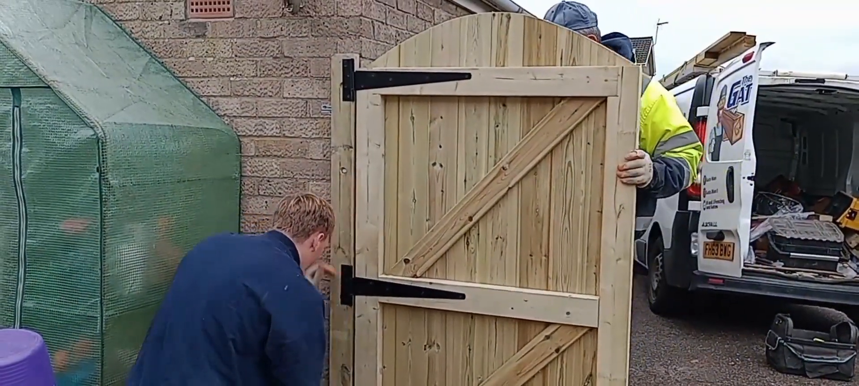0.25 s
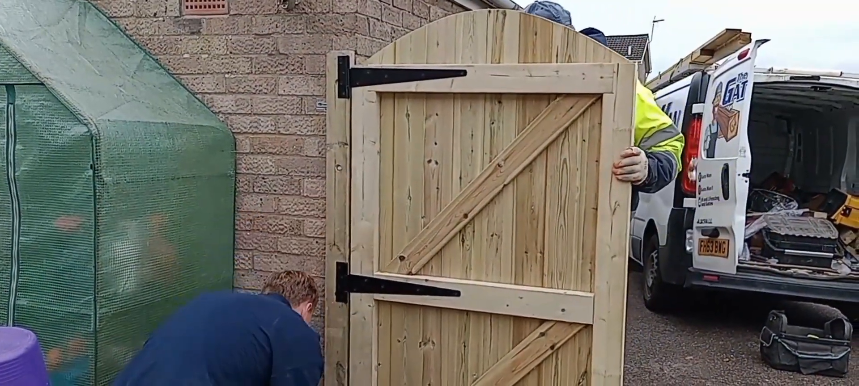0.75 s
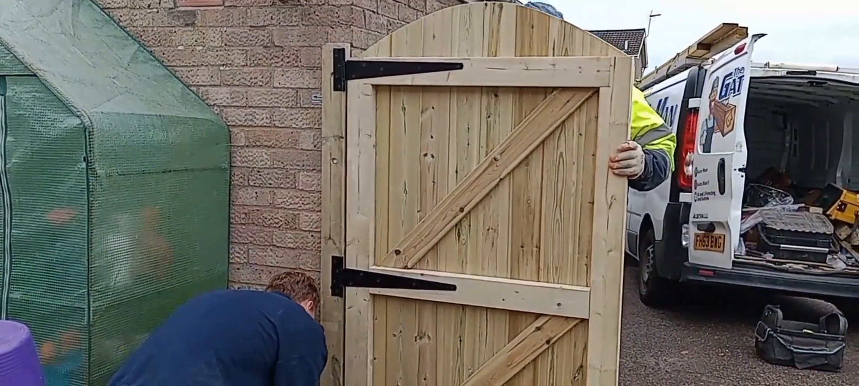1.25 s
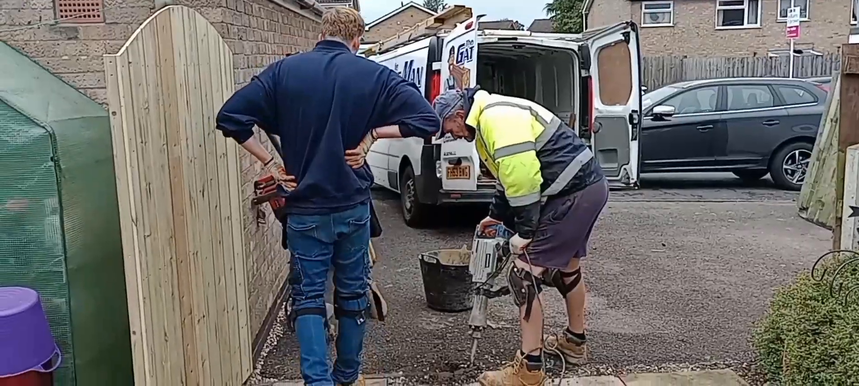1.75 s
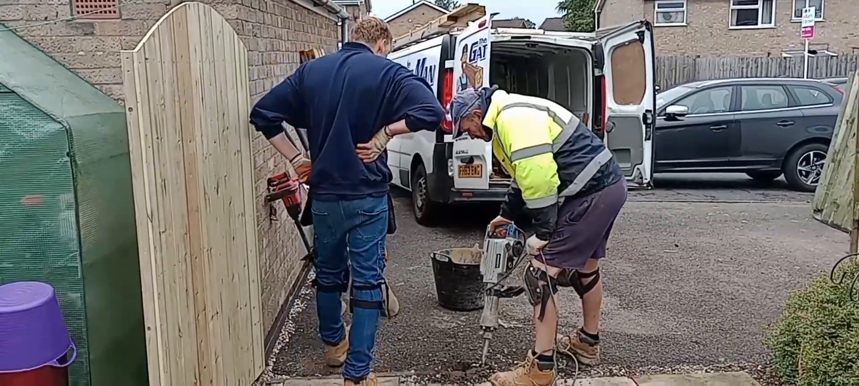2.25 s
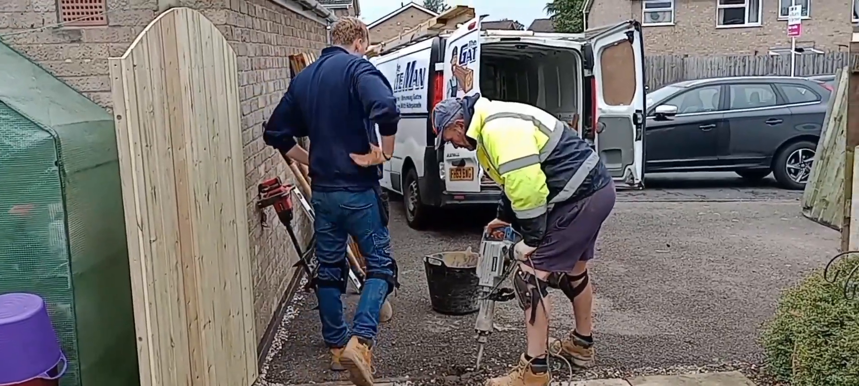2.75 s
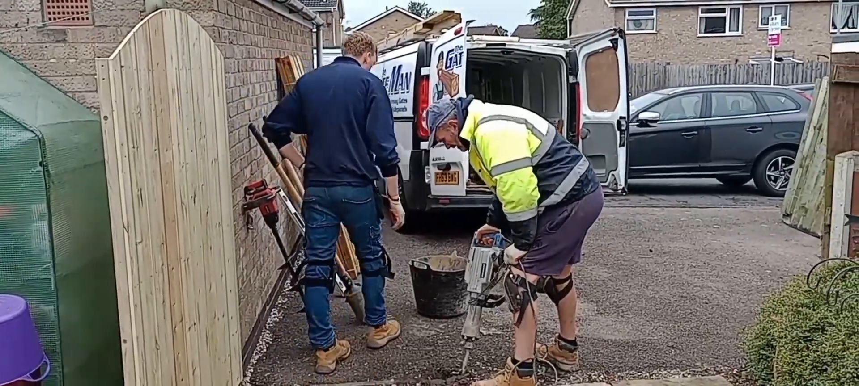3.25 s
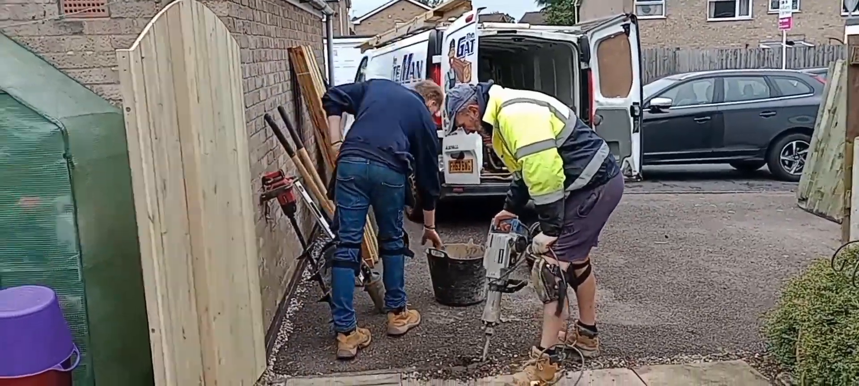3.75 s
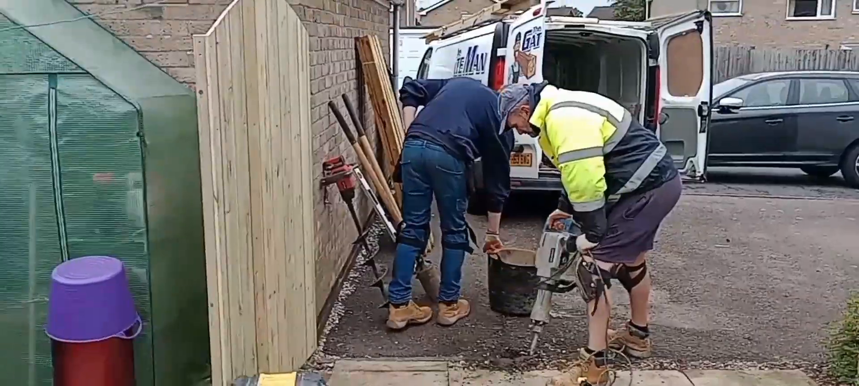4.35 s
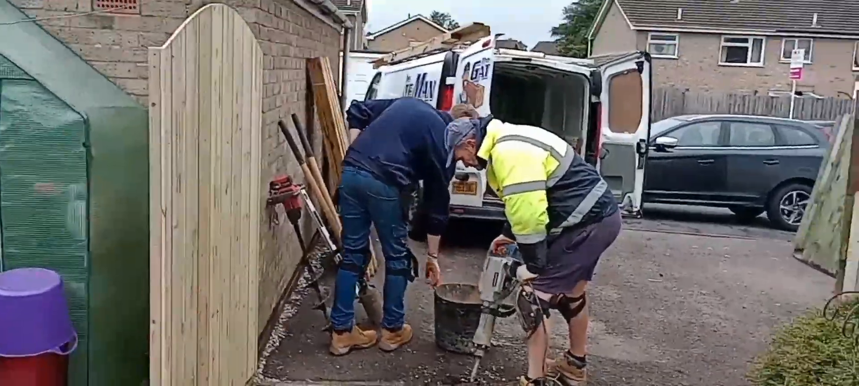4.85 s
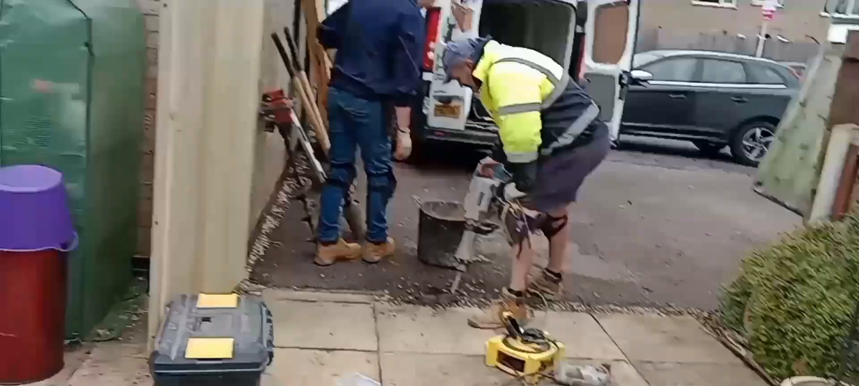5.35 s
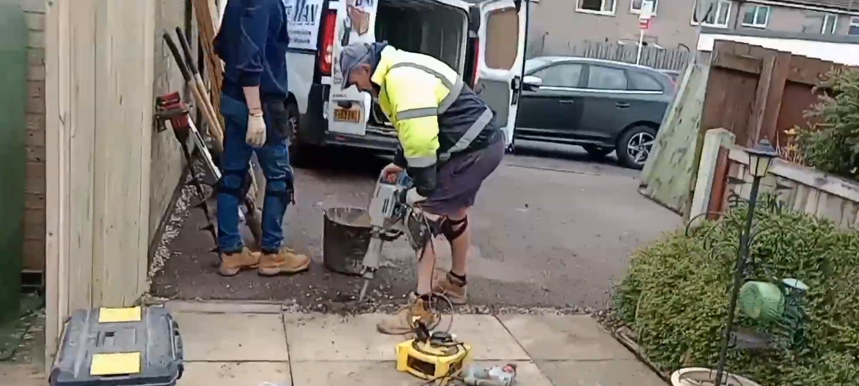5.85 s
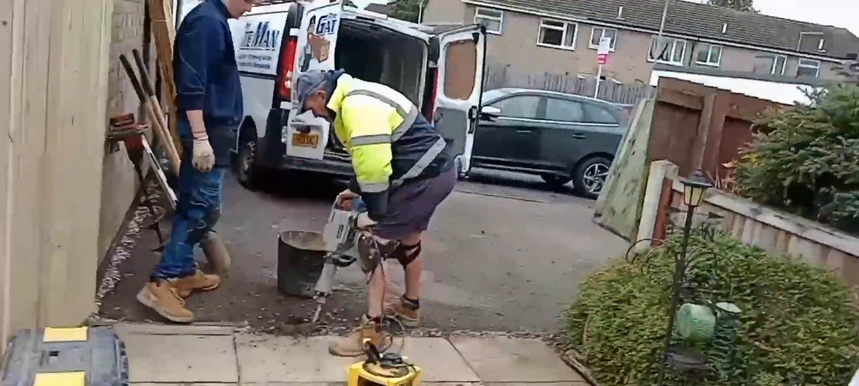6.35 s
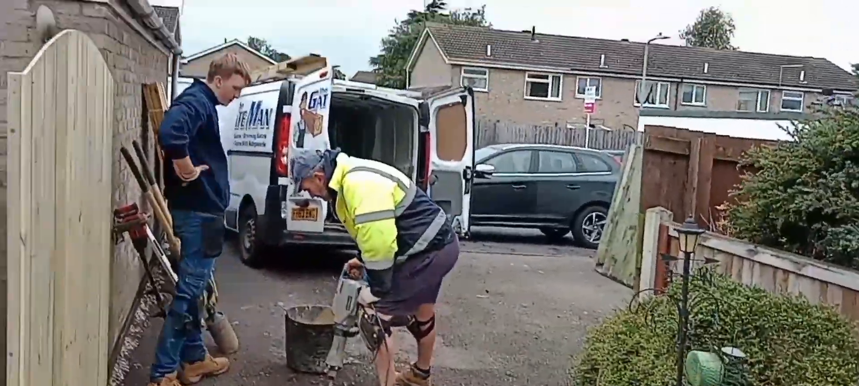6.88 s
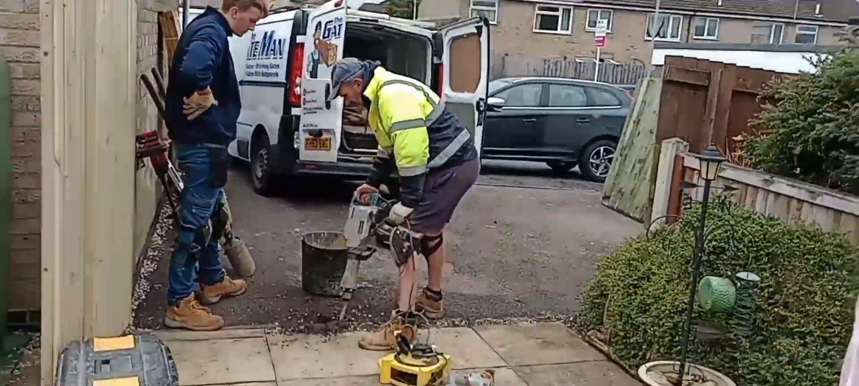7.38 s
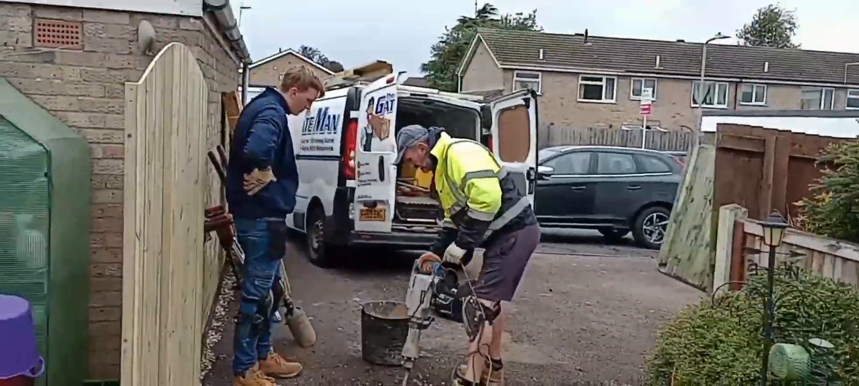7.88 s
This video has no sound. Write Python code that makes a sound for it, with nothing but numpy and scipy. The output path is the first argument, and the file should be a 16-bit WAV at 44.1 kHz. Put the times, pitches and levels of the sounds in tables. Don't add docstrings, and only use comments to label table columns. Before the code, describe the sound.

Two wooden gate knocks with a latch rattle in light wind, a brief silence, then an electric breaker hammers gravelly ground nonstop amid gusts.

```python
import sys
import numpy as np
from scipy import signal
from scipy.fft import rfft, irfft, next_fast_len
from scipy.io import wavfile
from scipy.ndimage import uniform_filter1d, map_coordinates

SR = 44100
rng = np.random.default_rng(int(sys.argv[2]) if len(sys.argv) > 2 else 0)


def to_wav(sig):
    pcm = np.clip(np.atleast_2d(sig), -1, 1) * 32767
    pcm = np.round(pcm).astype(np.int16)
    wavfile.write(sys.argv[1], SR, pcm.T)


def attenuation_scalar(level_db):
    decades = np.asarray(level_db, float) / 20
    return 10 ** decades


N = 358091
T = np.arange(N) / SR
SILENCE_S, BREAKER_S, FADE_IN_S = 1.263, 1.3, .19
MAX_BLOWS = 200


def unit(x):
    return x / np.sqrt(np.mean(x ** 2) + 1e-20)


def along(points, hz):
    f, v = np.transpose(points)
    return np.interp(np.log(hz + 1), np.log(f + 1), v)


def curves(rows):
    s, *cols = np.transpose(rows)
    return [np.interp(T, s, c) for c in cols]


def wobble(rate_hz):
    coarse = T[::12]
    knots = rng.standard_normal(int(N * rate_hz / SR) + 4)
    return np.interp(T, coarse, map_coordinates(knots, [coarse * rate_hz]))


def filtered(x, response):
    m = next_fast_len(N + 8192)
    return irfft(rfft(x, m) * response(np.fft.rfftfreq(m, 1 / SR)), m)[..., :N]


def noise(colour):
    return unit(filtered(rng.standard_normal(N), lambda f: attenuation_scalar(along(colour, f))))


def narrow(hz, width_hz):
    def resonance(f):
        return f * width_hz / abs(hz * hz - f * f + 1j * f * width_hz)
    return unit(filtered(rng.standard_normal(N), resonance))


def patchy(x, depth_db, bins, frames):
    z = signal.stft(x, nperseg=256)[2]
    field = uniform_filter1d(rng.standard_normal(z.shape), bins, 0)
    field = uniform_filter1d(field, frames, 1)
    return signal.istft(z * attenuation_scalar(depth_db * unit(field)), nperseg=256)[1][:N]


# (time [s], colour index)
TURN = [(2.4, 0), (2.7, 1), (6.6, 1), (6.85, 2), (7.78, 2.5), (7.86, 3)]
# (frequency [Hz], density [dB/Hz])
EARLY = [(180, -19), (300, -5), (384, -8), (468, -4.5), (651, -10.5), (718, -2), (1030, -8.5), (1640, -3.5),
         (3010, -2), (3610, 1), (4700, -5), (5730, -4), (8300, -7), (10800, -11), (12800, -3), (14300, -14),
         (15400, -21)]
MIDDLE = [(180, -17), (300, -10), (599, -4.5), (651, -11), (730, -3), (1070, -9), (1460, -4), (2430, -3.5),
          (3730, -0.5), (6650, -5), (7580, -3.5), (9240, -7), (11400, -6.5), (12800, -5), (15400, -9.5)]
LATE = [(180, -36.5), (300, -5.5), (543, -13), (599, 0), (755, -7.5), (833, -1.5), (1070, -8), (1370, -2.5),
        (1930, -8), (2730, -2.5), (3800, -7.5), (6220, -9.5), (8650, -2), (14000, -4.5), (15400, -12.5)]
LAST = [(180, -59), (300, -43), (517, -13.5), (1080, -9), (1180, -7), (2730, -0.5), (3050, -2), (3560, 1.5),
        (4400, -5.5), (9870, -10.5), (15400, -27)]


def coloured(x):
    turn, hz = curves(TURN)[0], np.linspace(0, SR / 2, 999)
    out = np.zeros(N)
    for k, colour in enumerate((EARLY, MIDDLE, LATE, LAST)):
        rms = np.sqrt(np.mean(attenuation_scalar(2 * along(colour, hz))))
        part = filtered(x, lambda f: attenuation_scalar(along(colour, f)) / rms)
        out += part * np.clip(1 - abs(turn - k), 0, 1)
    return out


# (frequency [Hz], density [dB/Hz])
AIR = [(180, -22), (300, 1), (397, -5), (730, 0.5), (967, -5.5), (1180, -3.5), (1840, -12), (4620, -19),
       (8370, -22.5), (15400, -30)]


def yard():
    air = patchy(rng.standard_normal(N), depth_db=1.0, bins=4, frames=20)
    return attenuation_scalar(-55) * unit(filtered(air, lambda f: attenuation_scalar(along(AIR, f))))


# (frequency [Hz], density [dB/Hz])
BUFFET = [(15, -50), (25, -27), (81, 1.5), (129, 2), (211, 0.5), (281, -7), (399, -11), (436, -14),
          (500, -9.5), (650, -43), (1100, -120)]
# (time [s], peak level [dB], time to fall 10 dB [s])
GUSTS = [(.3, -42, 0.3), (1.36, -45, 0.3), (1.65, -43, .4), (2.08, -36, 0.23), (2.29, -27, 0.09),
         (2.41, -31, 0.06), (2.54, -36, 0.14), (2.84, -34.5, 0.27), (3.63, -35.5, 0.08), (3.75, -42.5, 0.3),
         (4.26, -34, 0.1), (4.459, -22, 0.03), (4.65, -43, 1.7), (4.85, -27, .06), (4.99, -29, 0.1),
         (5.28, -27.5, 0.1), (5.43, -32.5, 0.17), (5.65, -38, 0.4), (6.14, -34.5, 0.05), (6.31, -33.5, 0.1),
         (6.45, -27, 0.1), (6.56, -26, 0.07), (6.75, -35, 0.4), (6.98, -34, 0), (7.15, -33.5, 1),
         (7.39, -33.5, .08), (7.53, -28.5, 0.1), (7.73, -26.5, 0.12), (7.9, -27, 0.06), (8.02, -36, 1)]
# (time [s], peak level [dB], pitch [Hz])
LUMPS = [(0.17, -21.5, 86.1), (0.188, -23, 180), (0.261, -34, 96.9), (0.284, -25, 171), (0.327, -20.5, 162),
         (0.365, -32, 88.8), (0.41, -34, 72.7), (0.46, -35, 72.7), (0.698, -37, 72.7), (0.736, -35, 91.5),
         (0.776, -42, 72.7), (0.802, -28, 127), (2.255, -21, 245), (2.277, -18, 415), (2.29, -18.5, 180),
         (2.306, -24, 110), (2.322, -22, 180), (2.34, -24, 150), (4.452, -16, 130), (4.465, -21, 180),
         (4.845, -21, 295), (5.253, -17, 195), (5.271, -15, 380), (5.287, -23, 215), (5.311, -17, 345),
         (5.331, -24, 175), (5.467, -22.5, 100), (6.457, -25, 340), (6.484, -21, 125), (6.503, -15, 245),
         (7.685, -22, 210), (6.375, -24, 83.4), (6.517, -16.5, 185), (6.553, -16, 151), (6.598, -16, 95),
         (7.518, -20, 196), (7.706, -17.5, 240), (7.766, -14.5, 230.5), (7.854, -18, 131.2),
         (7.907, -22.5, 137.3)]


def wind():
    coarse, calm_db = T[::100], -51
    peaks_db = np.max([top_db - 10 * abs(coarse - s) / fall_s for s, top_db, fall_s in GUSTS], axis=0)
    db = np.interp(T, coarse, np.maximum(calm_db, peaks_db)) + 2.27 * wobble(40)
    push = noise(BUFFET)
    edge = noise([(150, -5), (400, 1.0), (800, -11), (1500, -48)])
    lumps, swell = np.zeros(N), np.zeros(N)
    for (s, peak_db, hz), phase in zip(LUMPS, rng.uniform(0, 2 * np.pi, len(LUMPS))):
        near = slice(round((s - .04) * SR), round((s + .04) * SR))
        t = T[near] - s
        shape = attenuation_scalar(peak_db) * np.exp(-(t * hz / 0.64) ** 2)
        lumps[near] += shape * np.cos(2 * np.pi * hz * t + phase)
        swell[near] += shape * attenuation_scalar(1.4 * (peak_db + 18.0))
    reach_db = 1.7 * (db + 30)
    return attenuation_scalar(db) * push + (attenuation_scalar(reach_db - 41.5) + attenuation_scalar(-10.0) * swell) * edge + lumps


# (time [s], peak level [dB], latch rattle re knock [dB])
KNOCKS = [
    (0.101, -13, -18.5),
    (0.109, -20, -30),
    (0.151, -34, -10),
    (0.99, -12, -16),
    (1.003, -19, -35),
    (1.032, -25, -35),
    (1.057, -33, -14),
]
# (frequency [Hz], level [dB], t60 [s])
GATE = [(127.6, -7, 0.39), (151, -7, 0.32), (287.7, -8.5, 0.2), (430, -1, 0.099), (556, 1, 0.074),
        (666, -1, 0.074), (855, -26, 0.12)]
# (frequency [Hz], level [dB])
BOARDS = [(300, 0), (700, -1), (1200, -9.5), (2200, -20), (3500, -38)]
# (frequency [Hz], level [dB])
LATCH = [(1500, -20), (3500, -2.5), (5000, -1), (8000, -6), (12000, -15)]


def gate():
    out, t = np.zeros(N), np.arange(SR // 3) / SR
    boards, latch = noise(BOARDS), noise(LATCH)
    body_fade = (1 - np.exp(-t / 0.00088)) * (attenuation_scalar(-60 * t / 0.098) + attenuation_scalar(-10.5 - 60 * t / 0.35))
    rattle_fade = attenuation_scalar(-60 * t / 0.0073) + attenuation_scalar(-15 - 60 * t / 0.2)
    for s, db, rattle_db in KNOCKS:
        near = slice(round(s * SR), round(s * SR) + len(t))
        ring = np.zeros(len(t))
        for hz, mode_db, t60 in GATE:
            fade = attenuation_scalar(mode_db + 2 * rng.normal() - 60 * t / t60)
            ring += fade * np.sin(2 * np.pi * hz * t) * (1 - np.exp(-t * hz / 1.7))
        out[near] += attenuation_scalar(db - 6.5) * ring + attenuation_scalar(db - 11.0) * body_fade * boards[near]
        out[near] += attenuation_scalar(db + rattle_db - 1) * rattle_fade * latch[near]
    return signal.sosfilt(signal.butter(2, 70, 'high', fs=SR, output='sos'), out)


# (time [s], level [dB])
LOAD = [(1.33, 4.5), (1.49, -2.5), (2.09, 1.5), (3.9, -0.5), (4.1, 2), (4.36, 0), (4.8, .5), (4.93, -1),
        (5.35, .5), (5.8, -.5), (6.6, -.5), (6.9, 0.5), (7.36, 0), (7.64, -2.5), (8.11, 0.5)]
# (body level [dB], middle level [dB], treble level [dB])
RANGES = [
    (-33.5, -30.5, -28.5),
    (-35, -29.5, -30),
    (-31.5, -24.5, -30.5),
    (-32, -29.5, -24.5),
]


def motor():
    load_db, turn = curves(LOAD)[0], curves(TURN)[0]
    body_db, mid_db, treble_db = (load_db + np.interp(turn, range(len(RANGES)), db)
                                  for db in np.transpose(RANGES))
    rough = patchy(rng.standard_normal(N), depth_db=2.0, bins=4, frames=10)
    roar = coloured(rough * attenuation_scalar(1.45 * wobble(300) + 1.15 * wobble(90)))
    body = filtered(roar, lambda f: 1 / (1 + (f / 2500) ** 6))
    treble = filtered(roar, lambda f: 1 / (1 + (6000 / (f + 1)) ** 6))
    middle = roar - body - treble
    out = attenuation_scalar(body_db) * unit(body) + attenuation_scalar(mid_db) * unit(middle) + attenuation_scalar(treble_db) * unit(treble)
    return out * (T > BREAKER_S)


# (first blow [s], gap [s], level [dB], change a blow [dB])
RUNS = [(1.322, .0331, -19.5, .3), (1.721, .0343, -17, 0), (2.032, .0354, -16.5, -.1),
        (2.236, .046, -22.5, 2.5), (2.378, .0343, -19, .4), (2.582, .036, -14, -.3),
        (2.869, .0389, -14.5, .15), (3.27, .038, -18.5, 3), (3.34, .0391, -12.5, -.8),
        (3.661, .035, -17.5, 0), (3.696, .0442, -11.5, -1), (3.996, .0387, -15, -.1),
        (4.281, .0408, -15, -.7), (4.434, .0391, -12.5, -.25), (4.719, .036, -22, 0),
        (4.755, .0427, -12, -.9), (4.982, .035, -18.5, 1.5), (5.096, .045, -16, -2),
        (5.171, .0382, -14.5, .3), (5.445, .0432, -15.5, .25), (5.792, .044, -13, -.1),
        (6.054, .0422, -14, -.4), (6.263, .0391, -16.5, .15), (6.644, .042, -15, 0),
        (6.812, .0443, -18.5, .05), (7.431, .039, -15.5, -1.2), (7.557, .045, -16, 0),
        (7.602, .0416, -20, .4), (7.844, .036, -36, 7.5), (7.963, .033, -21, -3), (8.041, .0325, -24, .5)]
# (time [s], level re run [dB])
LANDINGS = [(1.4192, -2), (1.4528, -0.5), (1.52, -4), (1.9962, 2.5), (2.1021, -1), (2.138, 0.5),
            (2.3288, -0.5), (2.5834, 1.5), (2.69, 1), (2.7275, -1), (2.872, -1), (2.9088, -3.5),
            (2.984, 0.5), (3.0227, 1.5), (3.1397, 1), (3.179, -1), (3.4157, 0.5), (3.6604, 1),
            (3.7865, 1.5), (3.8304, 2), (3.913, 0.5), (3.9973, -0.5), (4.0705, -0.5), (4.109, -0.5),
            (4.1879, 1.5), (4.2302, -0.5), (4.2807, 0), (4.3203, 1.5), (4.3656, -0.5), (4.405, -0.5),
            (4.436, -0.5), (4.5493, 1.5), (4.6296, -2), (4.8412, 1), (4.884, 0), (4.9825, 2.5), (5.0946, 1),
            (5.1733, 0.5), (5.207, -0.5), (5.2446, 2), (5.4438, 0.5), (5.7034, 0), (5.8364, 1),
            (6.0108, 0.5), (6.262, 2.5), (6.7257, 1), (6.7723, 0.5), (6.8138, 1.5), (7.2965, 1), (7.345, 0),
            (7.3886, 3), (7.4303, -0.5), (7.5123, 1.5)]
# (time [s], level re run [dB])
ACCENTS = [(1.486, -6), (1.823, -4.5), (2.689, -3), (3.455, 1.5), (3.614, -1), (3.874, -4), (3.96, 2.5),
           (4.111, 3), (4.15, -3), (4.32, 3.5), (4.437, -2), (4.843, 1), (4.925, -1.5), (5.66, 1),
           (6.179, -0.5), (6.458, 3), (7.256, 2.5), (7.39, -4), (7.47, 2.5), (7.602, -13), (7.642, 3),
           (7.686, 3.5), (7.727, 1), (6.498, 3), (6.537, 1.5), (6.576, 1.5), (6.615, 1.5), (3.22, -2),
           (2.282, -3), (2.329, -3), (4.511, 2), (5.4, -1), (3.102, -2), (5.052, -3), (7.809, -2)]


def strikes():
    ends = [row[0] for row in RUNS[1:]] + [N / SR + .01]
    rows = []
    for (s, gap_s, db, step_db), end in zip(RUNS, ends):
        count = int(np.ceil((end - s) / gap_s - .55))
        rows += [(s + k * gap_s, db + k * step_db) for k in range(count)]
    out = []
    for s, db in rows[:MAX_BLOWS]:
        landed = [row for row in LANDINGS if abs(row[0] - s) < .012]
        accents = [row for row in ACCENTS if abs(row[0] - s) < .012]
        when = landed[-1][0] if landed else s
        out.append((when, db + sum(extra_db for _, extra_db in accents + landed)))
    return out


def since_blow():
    s = np.transpose(strikes())[0]
    last = np.clip(np.searchsorted(s, T) - 1, 0, len(s) - 1)
    return s, last, abs(T - s[last])


# (frequency [Hz], level [dB], t60 [s])
GROUND = [(132, -9, 0.051), (216, 0, 0.059), (395, -3.5, 0.053), (609, -1.5, 0.048), (757, -10, .05)]
# (frequency [Hz], level [dB])
SOIL = [(120, -30), (250, -6.5), (500, -2.5), (1000, -5), (1600, 1), (2800, -2.5), (4500, -25)]
# (time [s], level [dB], frequency [Hz], t60 [s])
PINGS = [
    (.153, -45, 2920, .05),
    (7.512, -19, 5080, .025),
    (7.812, -14, 3010, .09),
]


def thuds():
    out, t = np.zeros(N + SR), np.arange(SR // 8) / SR

    def ring(hz, db, t60):
        return attenuation_scalar(db - 60 * t / t60) * np.sin(2 * np.pi * hz * t) * (1 - np.exp(-t / 0.0011))

    soil = noise(SOIL)[:2 * len(t)].reshape(2, -1)
    soil = soil * attenuation_scalar(-1.5 - 60 * t / 0.19) * (1 - np.exp(-t / 0.0016))
    thud = sum(ring(*mode) for mode in GROUND)
    for k, (s, db) in enumerate(strikes()):
        angle = k * 0.1206
        tail = np.cos(angle) * soil[0] + np.sin(angle) * soil[1]
        out[round(s * SR):][:len(t)] += attenuation_scalar(.5 * db - 23.5) * (thud + tail)
    for s, db, hz, t60 in PINGS:
        out[round(s * SR):][:len(t)] += ring(hz, db, t60)
    return out[:N]


def spells_of(tone, spells, wear_db_per_s):
    s, last, since = since_blow()
    levels_db = np.full(len(s), -70.)
    for first, length, db in spells:
        inside = (s > first - .015) & (s < first + length + .015)
        levels_db = np.where(inside, db - wear_db_per_s * (s - first), levels_db)
    return tone * uniform_filter1d(attenuation_scalar(levels_db[last] - 60 * since / 0.3), size=60)


# (first blow [s], length [s], level [dB])
SQUEALS = [(3.18, .04, -21), (3.575, .04, -20.5), (3.696, 0, -26.5), (3.741, .09, -30), (3.874, .09, -22.5),
           (4.188, 0, -25), (4.23, 0, -28), (4.281, 0, -24), (4.627, 0, -17), (4.669, 0, -26),
           (4.719, 0, -35), (4.884, .04, -19), (5.018, 0, -32), (5.052, 0, -21), (5.208, 0, -30),
           (5.361, .04, -34)]
# (frequency [Hz], width [Hz], level [dB])
PARTNERS = [(10500, 140, -15), (12500, 220, -6)]


def squeal():
    tip_hz, drift_hz, since = 7390, 40, since_blow()[2]
    hz = tip_hz + 220 * np.exp(-since / 0.0057) + 2.8 * drift_hz * wobble(30) + drift_hz * wobble(400)
    tone = 1.7 * np.sin(2 * np.pi * np.cumsum(hz) / SR)
    tone *= attenuation_scalar(4.5 * wobble(220) - 1.5)
    tone = 0.83 * tone + 0.58 * narrow(tip_hz, 300)
    tone += sum(attenuation_scalar(db) * narrow(hz, width_hz) for hz, width_hz, db in PARTNERS)
    return spells_of(tone, SQUEALS, wear_db_per_s=51)


# (first blow [s], length [s], level [dB])
SLAB = [(2.236, 0, -34.5), (3.66, .04, -32.5), (4.149, 0, -23.5), (4.404, 0, -35), (5.052, 0, -33),
        (6.814, .13, -29), (6.99, .36, -30), (7.39, .08, -27.5), (7.547, 0, -28), (7.645, 0, -38),
        (7.685, .04, -31), (7.808, 0, -37)]


def slab():
    return spells_of(1.34 * narrow(1354, 130), SLAB, wear_db_per_s=27)


# (frequency [Hz], width [Hz], level held tight [dB])
HOUSING = [(1632, 50, -60), (8220, 170, -44), (12500, 140, -54)]
# (from [s], to [s], level [dB])
LOOSE = [
    [(2.7, 3.6, -38), (5.1, 6.5, -41), (7.8, 8.2, -40)],
    [(2.4, 2.8, -36), (3.2, 4.2, -37), (4.7, 5.0, -36.5), (5.8, 6.6, -32.5), (7.1, 7.65, -34.5)],
    [(2.2, 5.0, -34), (5.15, 6.55, -31), (7.27, 7.4, -40), (7.74, 7.88, -29)],
]
# (time [s], level [dB])
HANDLE = [(1.3, -31), (2.1, -33), (2.4, -48), (7.8, -45.5), (7.88, -28), (8.12, -28)]


def housing():
    _, last, since = since_blow()
    out = np.zeros(N)
    for spells, (hz, width_hz, tight_db) in zip(LOOSE, HOUSING):
        db = tight_db + sum((loose_db - tight_db) * ((T > a) & (T < b)) for a, b, loose_db in spells)
        db = uniform_filter1d(db, round(.12 * SR))
        grip_db = 2.8 * rng.standard_normal(MAX_BLOWS)[last] + 3.2 * wobble(150)
        level = attenuation_scalar(db + 1.0 + grip_db - 60 * since / 0.29)
        out += narrow(hz, width_hz) * uniform_filter1d(level, size=60)
    return out + narrow(5320, 320) * attenuation_scalar(curves(HANDLE)[0] - 60 * since / 0.32)


def chisel():
    return (squeal() + slab() + housing()) * (T > BREAKER_S)


# (frequency [Hz], level [dB], t60 [s])
CRACK = [(1600, -12, .008), (3900, -4, .006), (5630, -1, .004), (7800, -6, .003), (12500, -9, .002),
         (2200, -21, .04), (3100, -20, .04), (3750, -17, .05), (4500, -18, .04), (5750, -19, .04),
         (8300, -19, .04)]
# (time [s], level [dB])
CONTACT = [(1.3, 7), (2.2, 6), (2.3, 2), (2.6, 4), (4.5, 3), (6.5, 3), (6.9, 2), (7.3, 4), (7.75, 5),
           (7.85, 0), (8.12, 0)]


def cracks():
    out, t = np.zeros(N + SR), np.arange(SR // 32)[:, None] / SR
    hz, rel_db, t60 = np.transpose(CRACK)
    colours_db = np.array([along(c, hz) - along(EARLY, hz) for c in (EARLY, MIDDLE, LATE, LAST)])
    fade = attenuation_scalar(rel_db - 60 * t / t60)
    chances = rng.standard_normal((MAX_BLOWS, 2, len(CRACK)))
    for (s, db), (level_chance, pitch_chance) in zip(strikes(), chances):
        turn = np.interp(s, *np.transpose(TURN))
        colour_db = np.clip(1 - abs(turn - np.arange(len(colours_db))), 0, 1) @ colours_db
        modes = fade * np.sin(2 * np.pi * hz * (1 + .06 * pitch_chance) * t)
        click = modes @ attenuation_scalar(colour_db + 3 * level_chance)
        out[round(s * SR):][:len(t)] -= attenuation_scalar(db + np.interp(s, *np.transpose(CONTACT))) * click
    return out[:N]


# (delay [s], level [dB], t60 [s])
REBOUNDS = [
    (0, -6, 0.0042),
    (.0006, -2.5, 0.01),
    (.0025, -2.5, 0.015),
    (.006, -8.5, .03),
    (.012, -18.5, 0.096),
]
# (time [s], level [dB])
HARDNESS = [(1.3, -7), (2.2, -4), (2.4, -4), (3, -5), (4.5, -3.5), (6.5, 0.5), (6.9, 1), (8.12, 5)]
# (frequency [Hz], level [dB])
STRIKE = [(200, -21), (500, -3), (1000, -4.5), (3000, -3), (5500, -1), (8000, 1.5), (15000, -5)]
# (frequency [Hz], width [Hz], level [dB])
STEEL = [(3900, 470, -6), (5840, 520, -7.5), (8300, 460, -7.5), (13000, 730, -1)]


def drifting(size, memory):
    rows = rng.standard_normal((MAX_BLOWS, size))
    return signal.lfilter([np.sqrt(1 - memory ** 2)], [1, -memory], rows, axis=0)


def blows():
    out, t, hard_db = np.zeros(N + SR), np.arange(SR // 14) / SR, curves(HARDNESS)[0]
    answers, chances = drifting(len(t), memory=.88), drifting(10, memory=.7)
    late = rng.integers(-8, 8, MAX_BLOWS)
    for (s, db), answer, chance, shift in zip(strikes(), answers, chances, late):
        start = round(s * SR) + shift
        trail = []
        for (lag_s, rel_db, t60), lag_chance, level_chance in zip(REBOUNDS, chance, chance[5:]):
            since = t - lag_s * (1 + .1 * lag_chance)
            fade = np.exp(-2 * np.log(1000) * abs(since) / t60)
            trail.append((since >= 0) * attenuation_scalar(2 * (rel_db + 1.1 * level_chance)) * fade)
        shake = np.sqrt(trail[0] + attenuation_scalar(2 * hard_db[start]) * sum(trail[1:])) * answer
        level = attenuation_scalar(db + .7 * rng.normal()) * attenuation_scalar(-2)
        out[start:][:len(t)] += level * shake / np.std(shake[:SR // 160])

    def tool(f):
        steel = 1 + sum(attenuation_scalar(db) * 1j * f * w / (hz * hz - f * f + 1j * f * w) for hz, w, db in STEEL)
        return attenuation_scalar(along(STRIKE, f)) * steel

    return attenuation_scalar(-2.5) * coloured(filtered(patchy(out[:N], depth_db=1.76, bins=12, frames=9), tool))


# (time [s], level [dB])
WIDTH = [(0, -18), (2.6, -23), (2.9, -31.5), (8.12, -52)]


def scene():
    mid = yard() + wind() + gate() + motor() + thuds() + chisel() + cracks() + blows()
    flicker_db = np.where(wobble(30) > 1.6, -10, -60)
    width_db = np.maximum(curves(WIDTH)[0] + 3 * wobble(40), flicker_db)
    delayed = np.pad(mid, (37, 0))[:N]
    side = filtered(attenuation_scalar(width_db + 1.5) * delayed, lambda f: 1 / (1 + (4800 / (f + 1)) ** 12))
    return np.array([mid + side, mid - side])


def roll_off(x):
    return signal.sosfilt(signal.butter(12, 16660, fs=SR, output="sos"), x)


def record(dry):
    def microphone(f):
        return (f < 15550) / np.sqrt(1 + (42 / (f + 1)) ** 6)

    soft = filtered(dry / (1 + abs(dry / .66) ** 4) ** .25, microphone)
    edit = np.where(T < SILENCE_S, 1, np.clip((T - BREAKER_S) / FADE_IN_S, 0, 1))
    return roll_off(soft * edit)


dry = scene()
out = record(dry)
to_wav(out)
```